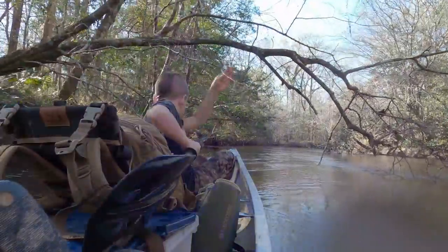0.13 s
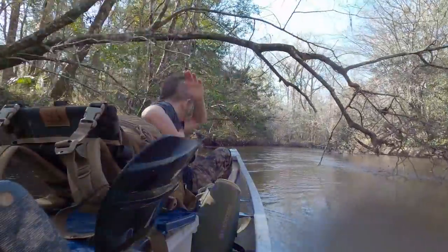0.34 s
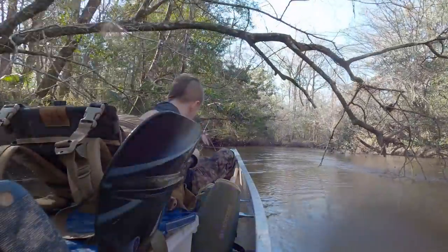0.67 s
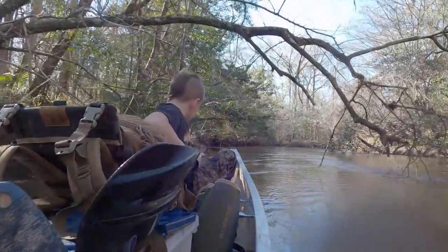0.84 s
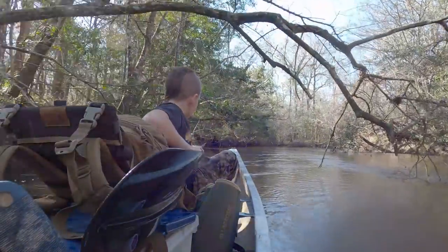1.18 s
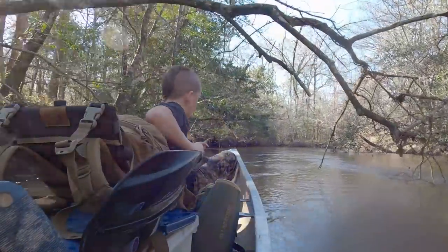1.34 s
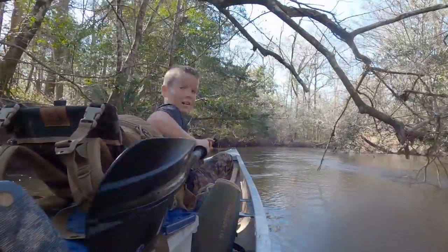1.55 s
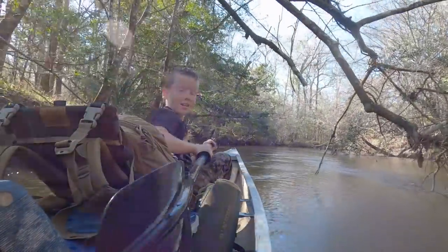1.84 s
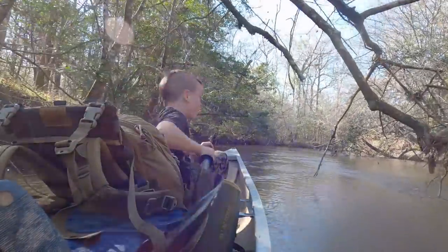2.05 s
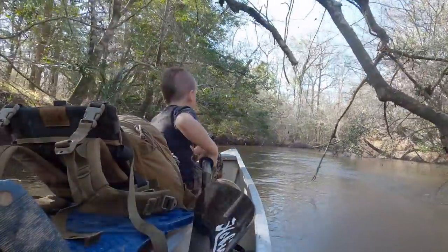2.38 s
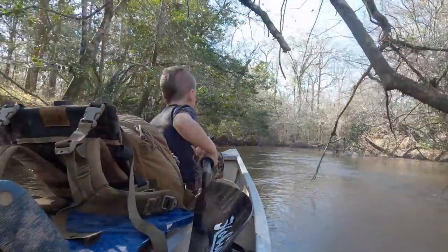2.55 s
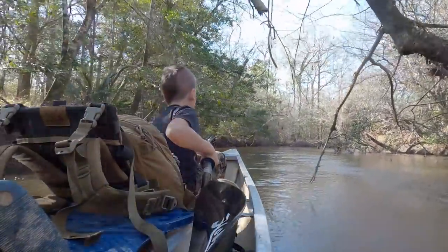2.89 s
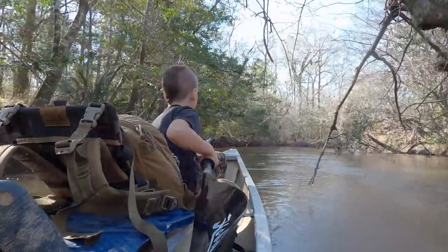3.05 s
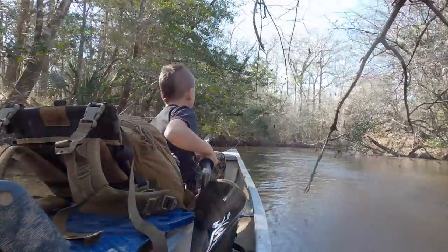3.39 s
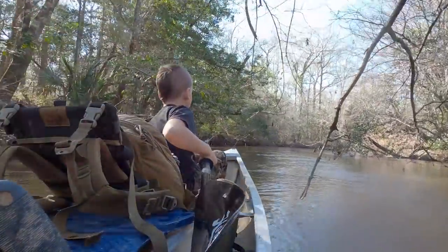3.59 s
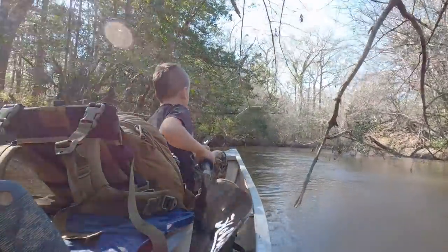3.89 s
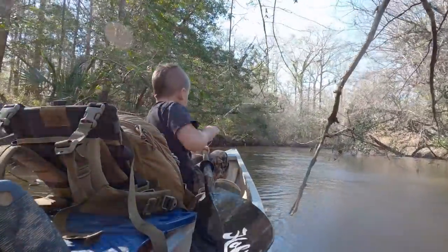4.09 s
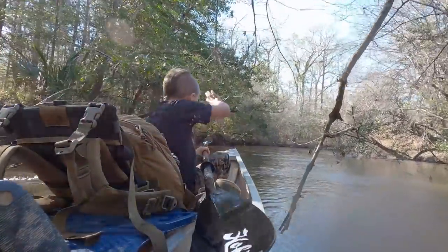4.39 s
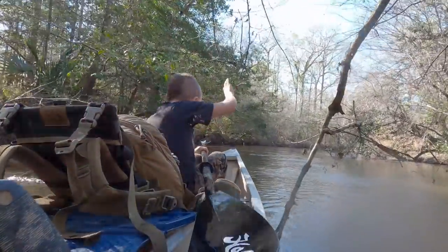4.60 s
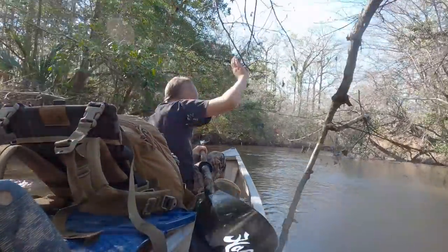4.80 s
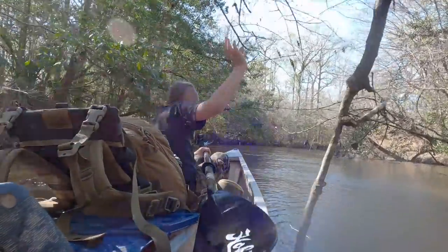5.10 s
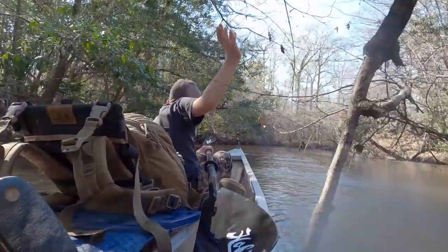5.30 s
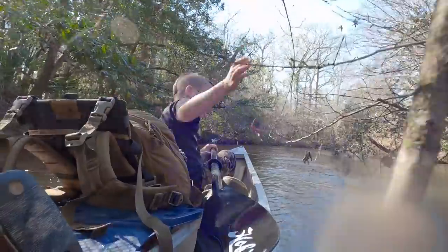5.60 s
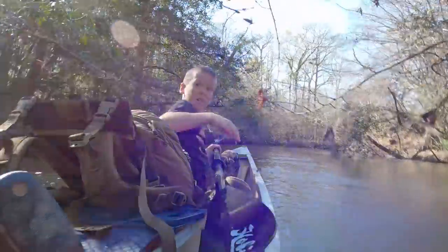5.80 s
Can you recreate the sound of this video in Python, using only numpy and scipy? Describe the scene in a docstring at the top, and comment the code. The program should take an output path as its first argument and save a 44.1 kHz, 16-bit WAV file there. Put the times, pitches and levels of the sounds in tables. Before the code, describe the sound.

Quiet river drifting with hollow paddle knocks and small bubbling plops, ending in a loud, bright branch scrape and overloaded thumps close up.

```python
"""On a quiet river, a loaded canoe drifts under low branches, heard from a camera on board.
A paddle knocks on the hull, gear rustles and water plops alongside; then a branch scrapes along the boat,
hisses close past and bangs into the camera on board, hard enough to overload its microphones.
Water and air are shaped noise and gliding bubbles, rubbing is many tiny slips that also make the hull groan,
and each blow is a low swing that dies away plus a set of ringing modes."""
import sys
import numpy as np
from scipy import signal
from scipy.fft import rfft, irfft, next_fast_len
from scipy.io import wavfile

SR = 44100
rng = np.random.default_rng(int(sys.argv[2]) if len(sys.argv) > 2 else 0)


def wrap_up_sound(samples):
    """Save the sound to the file named by the first command line argument, as 16-bit audio."""
    columns = np.atleast_2d(samples).T
    # keep every value between -1 and 1, then stretch to whole-number steps
    tamed = np.clip(columns, -1, 1)
    steps = np.round(tamed * 32767).astype(np.int16)
    wavfile.write(sys.argv[1], SR, steps)


N = 261983
T = np.arange(N) / SR


def undb(db):
    """Turn decibels into a gain."""
    return 10 ** (np.asarray(db) / 20)


def unit(x):
    """Scale a sound to rms 1."""
    return x / np.sqrt(np.mean(x ** 2) + 1e-20)


def struck_level(x, count):
    """Scale a sound by the spread of its first samples, so that its start has level 1."""
    return x / np.std(x[..., :count], axis=-1, keepdims=True)


def band(x, lo_hz, hi_hz, order=2):
    """Keep one band of pitches, without ringing ahead of the sound."""
    sos = signal.butter(order, [lo_hz, min(hi_hz, .45 * SR)], "band", fs=SR, output="sos")
    return signal.sosfilt(sos, x)


def colour(x, points):
    """Filter a sound by a curve of (frequency [Hz], gain [dB]) points."""
    hz, db = np.transpose(points)
    size = next_fast_len(x.shape[-1] + SR // 4)
    f = np.maximum(np.fft.rfftfreq(size, 1 / SR), 1)
    gain = undb(np.interp(np.log(f), np.log(hz), db))
    return irfft(rfft(x, size) * gain, size)[..., :x.shape[-1]]


def walk(rate):
    """Wander at random through a number of new values per second, with a spread near 1."""
    points = rng.standard_normal(2048)
    return np.interp(T * rate, np.arange(len(points)), points)


def ports(pair, side):
    """Mix two unrelated sounds into what both microphones share and what sets them apart."""
    apart = side * np.array([[1], [-1]]) * pair[1]
    return (pair[0] + apart) / np.sqrt(1 + side ** 2)


def pan(x, db):
    """Lean a sound to the left by a level difference; negative leans right."""
    return x * undb(np.array([[.5], [-.5]]) * db)


def add(out, s, sound):
    """Mix a sound in at a time in seconds."""
    i = int(np.clip(s * SR, 0, N - 1))
    out[:, i:i + sound.shape[-1]] += sound[..., :N - i]


def together(gains):
    """Join the gains of unrelated sounds, which add in power."""
    return np.sqrt(sum(g ** 2 for g in gains))


def stroke(start, length, attack_s, swell_db, release_s):
    """Gain of one push: a quick attack, a swell to full strength at its end, then a release."""
    t = np.maximum(T - start, 0)
    attack = 1 - np.exp(-t / attack_s)
    swell = undb(swell_db * np.minimum(t / length - 1, 0))
    release = np.exp(-np.maximum(t - length, 0) / release_s)
    return attack * swell * release


def buffeting(rise_s=0.018, most_db=-20, shudder_db=-7.5, fade_s=0.046, breeze_db=-36.5, ease_db_per_s=1.03):
    """Gain of the rumble: a slowly dropping breeze, and a low shudder after every blow."""
    shudders = []
    for s, thud_db, *_ in BLOWS:
        level_db = min(thud_db, most_db) + shudder_db  # the hardest blows shudder no more than a limit
        shudders.append(undb(level_db) * stroke(s, 2 * rise_s, rise_s, 0, fade_s))
    return together([undb(breeze_db - ease_db_per_s * T)] + shudders)


# tone of the hiss of water and woods: (frequency [Hz], gain [dB])
RIVER_TONE = [(300, -1), (500, 4.5), (750, -6.5), (1150, -0.5), (1800, 1), (3000, -13), (5000, -3),
              (7000, -15.5), (10000, -21), (15000, -53)]
# tone of the low rumble of breeze and shudders: (frequency [Hz], gain [dB])
RUMBLE_TONE = [(15, -4), (35, 3), (55, 0), (85, 1), (120, -7.5), (175, -9), (240, -16.5), (350, -25.5),
               (600, -43), (1200, -97)]


def river(hiss_db=-60, hiss_pan_db=1, wind_pan_db=4):
    """Water and woods are a smooth noise; breeze and shudders a low one, its bass gusty and more to the left."""
    hiss = unit(colour(ports(rng.standard_normal((2, N)), side=1.0), RIVER_TONE))
    hiss = hiss * undb(hiss_db + 0.46 * walk(9.6))
    rumble = unit(colour(ports(rng.standard_normal((2, N)), side=0.57), RUMBLE_TONE))
    wind = colour(rumble, [(120, 2.0), (260, -13)])
    rest = rumble - wind
    gusts = undb(3.2 * walk(14))
    rumble = pan(wind, wind_pan_db) * gusts + rest
    return pan(hiss, hiss_pan_db) + rumble * buffeting()


def bubble(db, hz, glide, t60):
    """A bubble rings and dies away while its pitch glides, rising as it nears the surface or at times falling."""
    t = np.arange(int(t60 * SR) + 1) / SR
    phase = 2 * np.pi * np.cumsum(hz * 2 ** (glide * t)) / SR
    onset = 1 - np.exp(-t / 0.00052)
    return np.sin(phase) * undb(db - 60 * t / t60) * onset


def drips(count=30, level_db=-51, spread_db=3, low_hz=1150, octaves=1.52, glide=10, t60_s=0.053):
    """Lone faint drips fall at random, most of them low in pitch; glide is the fastest rise in octaves/s."""
    rows = []
    for when, size, pitch, rise, life in rng.random((count, 5)):
        db = level_db + spread_db * (2 * size - 1)
        hz = low_hz * 2 ** (octaves * pitch ** 2)
        rows.append((when * T[-1], db, hz, glide * rise, t60_s * (.5 + life)))
    return rows


# wavelets running up the side as the boat rocks: (start [s], length [s], gurgle level [dB])
WAVELET_PUSHES = [(0.27, 0.11, -55), (0.495, 0.15, -52), (0.807, 0.03, -43), (1.178, 0.14, -52.5),
                  (1.4, 0.32, -42.5), (1.965, 0.15, -52), (2.84, 0.086, -59.5), (3.45, 0.15, -61),
                  (4.792, 0.31, -41.5)]


def lapping(trickle_db=-67, attack_s=0.0098, swell_db=11, release_s=0.037):
    """Gain of the gurgle: wavelets swell over a steady trickle."""
    gains = [undb(trickle_db)]
    for s, length, db in WAVELET_PUSHES:
        gains.append(undb(db) * stroke(s, length, attack_s, swell_db, release_s))
    return together(gains)


# clear bubbles beside the boat: (time [s], level [dB], start pitch [Hz], pitch rise [octaves/s],
# time to fall by 60 dB [s])
CLEAR_PLOPS = [(1.232, -45, 1400, 18, 0.08), (1.288, -48, 1040, -6, 0.16), (1.788, -34.5, 1480, 15, 0.023),
               (2.001, -46, 876, 8.5, 0.1), (2.03, -44, 1350, 14, 0.09), (2.054, -40, 1820, 0, 0.055),
               (2.887, -46, 1080, -3, 0.09), (2.993, -39, 1340, -2, 0.063), (3.372, -47, 1570, 8, .05),
               (3.462, -52, 1580, -18, 0.093), (3.551, -38.5, 908, 2.5, 0.24),
               (3.564, -39.5, 1000, 20.5, 0.093), (3.591, -45, 1420, -6, .07), (4.178, -47, 1590, 1, 0.06),
               (4.199, -43, 2160, 5, 0.05)]


def water(count=2800, spread_db=5, wobble_db=3, pan_db=3):
    """Clear plops and faint drips ring over a gurgle of many short bubbles, most of them low in pitch."""
    plops, gurgle = np.zeros((2, 2, N))
    for s, *plop in CLEAR_PLOPS + drips():
        add(plops, s, bubble(*plop))
    for when, size, pitch, rise, life, lean in rng.random((count, 6)):
        hz = 1050 * 2.9 ** (pitch ** 1.5)
        db = -spread_db * np.log(size + .03) - 4 * pitch  # a few loud ones, high ones fainter
        sound = bubble(db, hz, 14 * rise - 6, .008 + .032 * life)
        add(gurgle, when * T[-1], pan(sound, 20 * (lean - .5)))
    plops = plops * undb(wobble_db * walk(220))
    return plops + pan(unit(gurgle) * lapping(), pan_db)


# what the hull rings with: (frequency [Hz], level [dB], time to fall by 60 dB [s])
HULL_MODES = [(89.4, 4, 0.48), (123.5, -4, 0.31), (146.6, 6, 0.11), (180.4, 7.5, 0.23), (261.6, 0.5, 0.157),
              (319.6, 1.5, 0.1), (377, 1.5, 0.044), (459.3, -11, 0.092), (608.4, -11.5, 0.19),
              (678.3, -8.5, 0.15), (765.5, -6.5, 0.097), (933, -20.5, 0.19), (1094, -17.5, 0.19),
              (1145, -22.5, 0.022), (1470, -7, 0.072), (1610, 2.5, 0.016), (2014, -12, 0.096),
              (2140, -3, 0.017), (2694, -4, 0.014), (2995, -1.5, 0.037), (3980, -10, 0.036)]
# tone of the dense short ring of the blade and shaft: (frequency [Hz], gain [dB])
CRACK_TONE = [(60, 9), (200, 19.5), (500, 4.5), (850, -13.5), (1200, 6), (1800, -2), (3000, -9),
              (5300, -10), (8000, -23.5), (12000, -16), (16000, -48)]


def hull_ring(crack_db, tail_db, crack_t60=0.0073, tail_t60=0.17, place_db=1.0):
    """One tap rings modes weighted at random by place, plus a short crack and a tail whose treble dies first."""
    t = np.arange(SR // 2) / SR
    hz, db, t60 = np.transpose(HULL_MODES)[:, :, None]
    place, detune, sign = rng.standard_normal((len(HULL_MODES), 3)).T[:, :, None]
    swing = np.sin(2 * np.pi * hz * (1 + 0.015 * detune) * t)
    fade = undb(db + place_db * place - 60 * t / t60)
    modes = np.sum(np.sign(sign) * fade * swing, axis=0)
    noise = unit(colour(rng.standard_normal(len(t)), CRACK_TONE))
    crack = noise * undb(-60 * t / crack_t60)
    tail = 0
    for f in 2. ** np.arange(6, 14):  # one octave at a time
        octave_t60 = tail_t60 * (f / 1000) ** -.25
        tail = tail + band(noise, f, 2 * f) * undb(-60 * t / octave_t60)
    return modes + undb(crack_db) * crack + undb(tail_db) * tail


def slips(rate, spread_db, uneven_db):
    """Rubbing sticks and slips: dense clicks (rate per second) of very unequal size, in a wandering level."""
    hits = rng.random((2, N)) < rate / SR
    size = undb(spread_db * np.minimum(rng.exponential(size=(2, N)), 5)) * rng.standard_normal((2, N))
    return unit(hits * size) * undb(uneven_db * (walk(45) + walk(160)) / 2)


# overall tone of the rubbing: (frequency [Hz], gain [dB])
FRICTION_TONE = [(400, 3.5), (750, -18), (1200, -13), (1800, -2), (3000, 1), (4500, -0.5), (6500, -4.5),
                 (9500, -6.5), (12500, -15.5), (16000, -27)]


def rustle(flicker_db=4.5):
    """Slips change colour as other fibres and twigs catch; the two microphones differ most in the treble."""
    out = 0
    for hz in 400 * 2 ** np.arange(0, 5.5, .5):  # half an octave at a time
        pair = ports(slips(rate=5600, spread_db=1.5, uneven_db=-1), side=.3 + hz / 25000)
        flicker = undb(flicker_db * (walk(22) + walk(79)) / 2 ** .5)
        out = out + band(pair, hz, hz * 2 ** .5) * flicker
    return unit(colour(out, FRICTION_TONE)) * undb(0.53 * walk(130))


def rub(start, length, friction_db, groan_db, boom_db, attack_s, swell_db, release_s, boom_release_s=0.062):
    """One rub drives three things: hiss, the hull's groan and its low boom, which outlasts the rubbing."""
    push = stroke(start, length, attack_s, swell_db, release_s)
    ring = stroke(start, length, attack_s, swell_db, boom_release_s)
    return np.array([undb(friction_db) * push, undb(groan_db) * push, undb(boom_db) * ring])


# the load never lies quite still: (friction level [dB], groan level [dB], boom level [dB])
RESTING_GEAR = (-62.5, -68, -63.5)
# the paddle is shifted over the packs:
# (start [s], length [s], friction level [dB], groan level [dB], boom level [dB])
PADDLE_SHIFTS = [(0.063, 0.071, -56, -74, -63), (0.247, 0.17, -51, -57, -60),
                 (0.446, 0.11, -43.5, -49, -53), (0.617, 0.083, -47, -53, -48),
                 (0.768, 0.19, -47, -65, -40.5), (1.113, 0.054, -49, -79, -62),
                 (1.21, 0.084, -51, -83, -60), (1.386, 0.061, -44, -76, -58),
                 (1.488, 0.21, -45, -51, -36.5), (1.856, 0.025, -40.5, -45.5, -34.5),
                 (2.127, 0.054, -55.5, -58, -55), (2.246, 0.095, -59, -68, -64)]
# the branch scrapes, from the first twigs to the trunk:
# (start [s], length [s], friction level [dB], groan level [dB], boom level [dB])
BRANCH_SCRAPES = [(4.276, 0.48, -52, -58, -47.5), (4.78, 0.24, -40.5, -37, -36),
                  (5.044, 0.23, -36.5, -34, -34.5), (5.265, 0.026, -31, -24.5, -11),
                  (5.286, 0.13, -27, -46, -33.5), (5.425, 0.34, -30.5, -39.5, -27.5),
                  (5.513, 0.048, -36, -26.5, -24), (5.79, 0.016, -26, -26, -14),
                  (5.877, 0.014, -25, -18, -14)]


def rubs():
    """Gains of hiss, groan and boom: each shift or scrape presses harder until it stops, over the resting load."""
    rest = undb(RESTING_GEAR)[:, None]
    shifts = [rub(*row, attack_s=0.0028, swell_db=7.5, release_s=0.041) for row in PADDLE_SHIFTS]
    scrapes = [rub(*row, attack_s=0.0035, swell_db=4.5, release_s=0.032) for row in BRANCH_SCRAPES]
    return together([rest] + shifts + scrapes)


def rubbing(top_db=-4, pass_s=5.514, pass_width_s=0.16, pass_db=12, gear_pan_db=0.5, branch_pan_db=-0.5):
    """Gear, then branch, hisses, brightest as the twigs sweep close past; slips set the hull groaning."""
    friction, groan, boom = rubs()
    bright_db = top_db + pass_db / (1 + ((T - pass_s) / pass_width_s) ** 2)
    hiss = rustle()
    top = colour(hiss, [(1500, -46), (4500, -5.5), (9000, 5.5)])
    hiss = (hiss - top + top * undb(bright_db)) * friction
    drive = slips(rate=2100, spread_db=0.5, uneven_db=7.5)
    rings = [signal.fftconvolve(d, hull_ring(crack_db=19, tail_db=1.0))[:N] for d in drive]
    hull = ports(rings, side=0.39)
    groaning = unit(band(hull, 434, 1355)) * groan
    booming = unit(band(hull, 142.5, 246)) * boom
    lean_db = np.interp(T, [4.4, 5.3], [gear_pan_db, branch_pan_db])  # from slightly left to slightly right
    return pan(hiss + groaning + booming, lean_db)


# clear ticks of twigs, buckles and paddle: (time [s], level before the common level_db [dB],
# centre [Hz], fading time [ms])
DRY_TICKS = [(0.464, -28.5, 2300, 14), (0.498, -34, 2930, 5.9), (0.546, -29.5, 4100, 7.1),
             (0.554, -24, 5000, 2.5), (0.596, -30.5, 6400, 1.8), (0.608, -29, 2430, 6.8),
             (0.672, -17.5, 1440, 2.7), (1.046, -41, 5530, 8.8), (1.118, -33.5, 5430, 9.8),
             (1.252, -32, 3340, 2.2), (1.286, -33.5, 5450, 6.4), (1.347, -38, 6650, 19),
             (1.396, -29, 6800, 3.2), (1.418, -35, 4860, 4.2), (1.522, -25, 2950, 4.6),
             (1.659, -27.5, 1550, 17), (1.757, -36, 5430, 18), (1.782, -34.5, 5550, 6.1),
             (1.842, -46, 6900, 1.2), (1.941, -37.5, 6100, 5.9), (2.124, -24, 6660, 7.2),
             (2.407, -46.5, 6000, 2.5), (2.512, -39, 5360, 2), (2.618, -37.5, 4760, 11.6),
             (2.862, -39.5, 3370, 3.2), (4.754, -29.5, 2950, 6), (5.396, -5.5, 4080, 0.76),
             (5.406, -12, 3450, 1.5), (5.547, -15, 2500, 11), (5.609, -16, 8140, 2.8),
             (5.666, -16.5, 4820, 1.7)]


def ticks(level_db=-8, tail_db=-22, tail_s=0.019, pan_db=4.5):
    """Small dry contacts: a burst of noise in one broad resonance with a faint tail."""
    out, t = np.zeros((2, N)), np.arange(SR // 10) / SR
    for s, db, hz, ms in DRY_TICKS:
        fade = np.exp(-t * 1000 / ms) + undb(tail_db) * np.exp(-t / tail_s)
        noise = ports(rng.standard_normal((2, len(t))), side=0.51)
        burst = band(noise * fade, hz * 0.71, hz * 1.15, order=1)
        burst = band(burst, 300, 8400, order=2)
        add(out, s, burst / np.std(burst[:, :SR // 500]) * undb(db + level_db))
    return pan(out, pan_db)


def jolt(hz, t60=0.091, rise_s=0.0048):
    """What is struck gives way under the blow and swings back and forth as it dies away."""
    t = np.arange(SR // 2) / SR
    return np.sin(2 * np.pi * hz * t) * undb(-60 * t / t60) * (1 - np.exp(-t / rise_s))


# blows of the paddle on the hull and of the branch on the camera:
# (time [s], thud level before jolt_db and boom_db [dB], ring level before the change of each band [dB],
# hardness gained by the crack and lost by the body [dB], thud pitch [Hz], body centre [Hz],
# fading time of the chattering contact [ms])
BLOWS = [(0.864, -26.5, -41.5, 9.5, 113, 490, 2.4), (0.895, -34, -37.5, 1.5, 67.5, 493, 2.2),
         (0.916, -22.5, -35.5, -5.5, 108, 640, 1.46), (0.937, -47, -39, 5, 101, 600, 1.5),
         (1.008, -36.5, -64.5, -23, 127, 454, 1.9), (1.8423, -30, -28.5, 2.5, 100, 454, 1),
         (1.864, -22.5, -35, -3.5, 87, 367, 1.9), (2.123, -20.5, -28.5, -9, 160, 510, 4.8),
         (2.138, -23, -41, -1.5, 145, 485, 4.2), (3.091, -43.5, -49, -1, 109, 454, 6.2),
         (4.128, -28, -30.5, 0.5, 178.5, 530, 1.66), (4.809, -39, -37.5, -11, 162, 695, 18),
         (5.234, -35, -22, 0.5, 170, 595, 2), (5.254, -18.5, -19, -9.5, 174, 650, 6.9),
         (5.749, -11.5, -31, -13, 169.6, 400, 3.9), (5.816, -35, -21.5, 1.5, 136, 540, 6),
         (5.826, -7, -14.5, -4, 194.3, 667, 6.9), (5.841, -6.5, -23, 0, 94.8, 705, 2.4),
         (5.891, -12, -15, -7, 126, 664, 2.2), (5.911, -12, -21, -6.5, 99, 700, 2.1)]


def knocks(chatter=0.28, jolt_db=-2, boom_db=-5, clack_db=1.5, body_width=1.587, top_hz=8500,
           cross_s=2.0, left_pan_db=1, right_pan_db=-2):
    """Each blow chatters briefly and sets off a ring; soft ones favour its body, hard ones its crack."""
    out, t = np.zeros((2, N)), np.arange(SR // 16) / SR
    for s, thud_db, ring_db, hard_db, thud_hz, body_hz, chatter_ms in BLOWS:
        contact = chatter * rng.standard_normal(len(t)) * np.exp(-t * 1000 / max(chatter_ms, .1))
        contact[0] += 1
        ring = ports([hull_ring(crack_db=22, tail_db=5.0) for _ in range(2)], side=0.28)
        blow = signal.fftconvolve(ring, contact[None])[:, :SR // 2]
        boom = struck_level(band(blow, 93, 292, order=3), count=SR // 25)
        flex = struck_level(jolt(thud_hz), count=SR // 25)
        sound = undb(thud_db) * (undb(jolt_db) * flex + undb(boom_db) * boom)
        body = (-hard_db, body_hz / body_width, body_hz * body_width)
        clack = (clack_db, 950, 2500)
        crack = (hard_db, 2500, top_hz)
        for db, lo_hz, hi_hz in [body, clack, crack]:
            part = struck_level(band(blow, lo_hz, hi_hz, order=3), count=SR // 50)
            sound = sound + undb(ring_db + db) * part
        # early paddle blows lean left; later ones, and the branch's, lean right
        add(out, s, pan(sound, left_pan_db if s < cross_s else right_pan_db))
    return out


def scene():
    """Everything on and around the boat; contacts reach the left microphone one sample after the right."""
    left, right = knocks() + ticks() + rubbing()
    contacts = np.array([np.append(0, left[:-1]), right])
    return contacts + water() + river()


# tone of the microphones: (frequency [Hz], gain [dB])
MICROPHONE_TONE = [(8, -8), (20, 1), (6000, -1), (10000, -3), (13000, -1.5), (16000, -1)]


def record(dry, top_hz=15800):
    """The microphones round off overloads, colour the sound and cut everything above the top."""
    rounded = dry / (1 + np.abs(dry) ** 8) ** (1 / 8)
    cut = signal.ellip(8, .2, 70, top_hz, fs=SR, output="sos")
    return signal.sosfilt(cut, colour(rounded, MICROPHONE_TONE))


dry = scene()
out = record(dry)
wrap_up_sound(out)
```